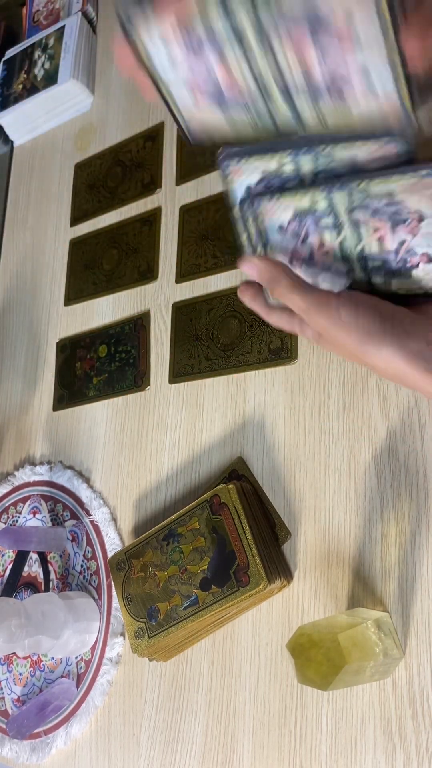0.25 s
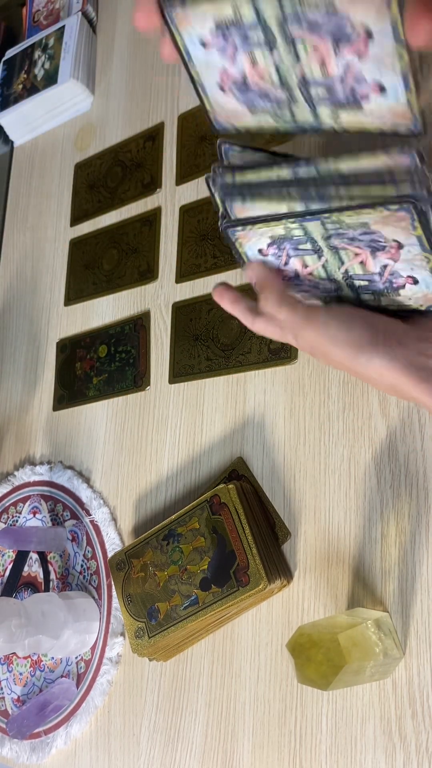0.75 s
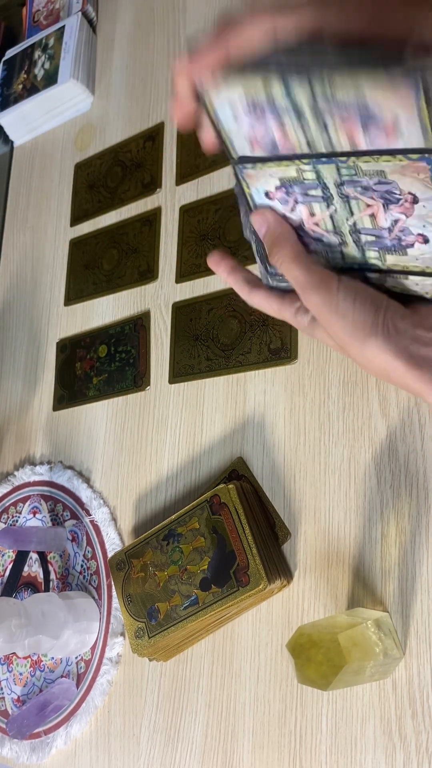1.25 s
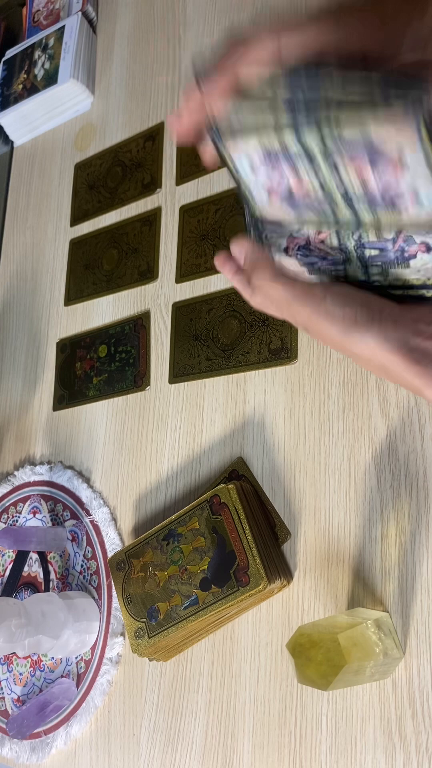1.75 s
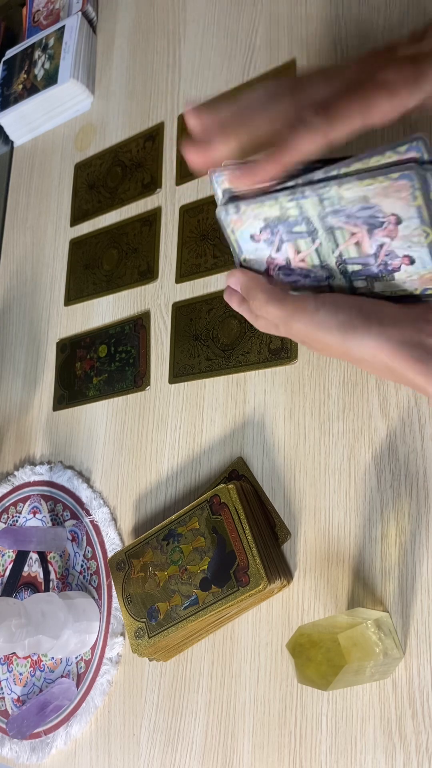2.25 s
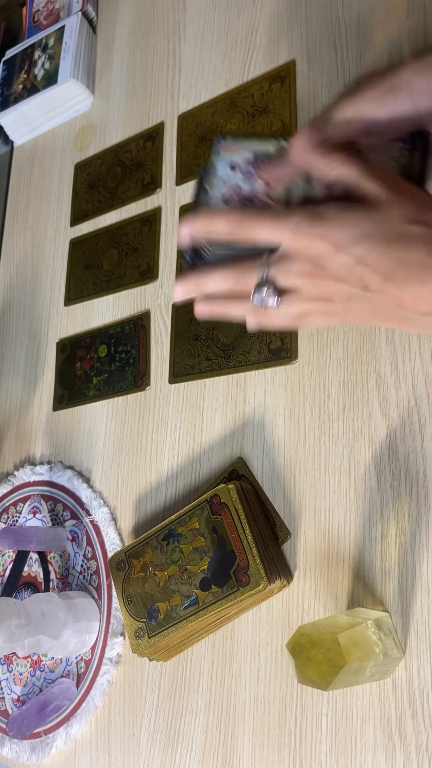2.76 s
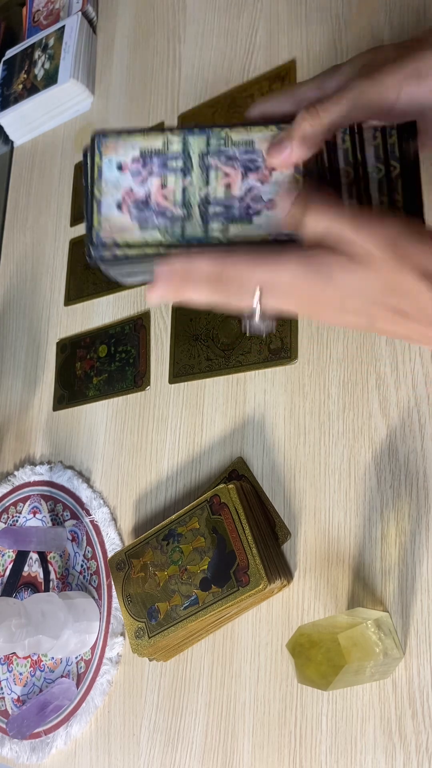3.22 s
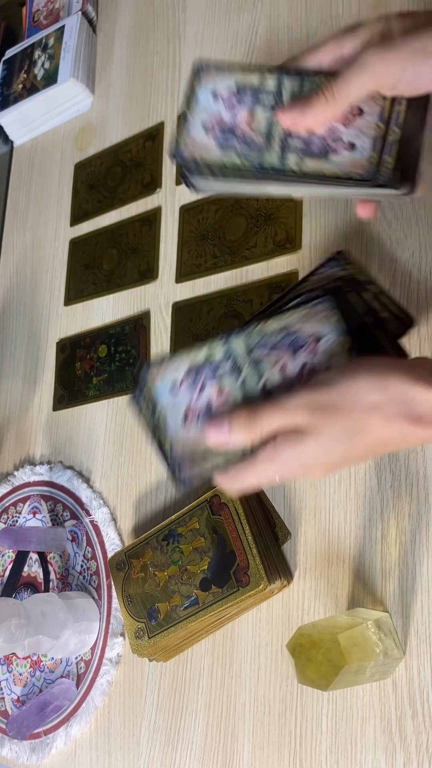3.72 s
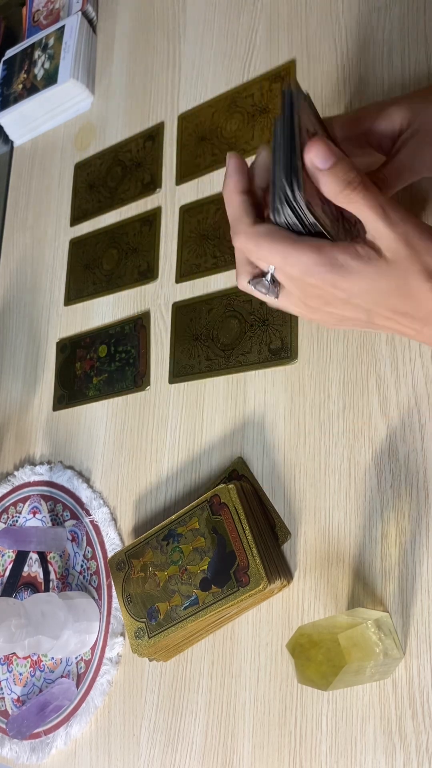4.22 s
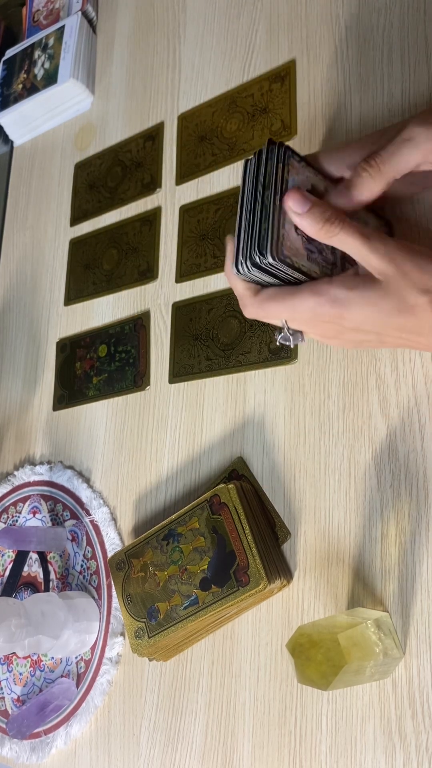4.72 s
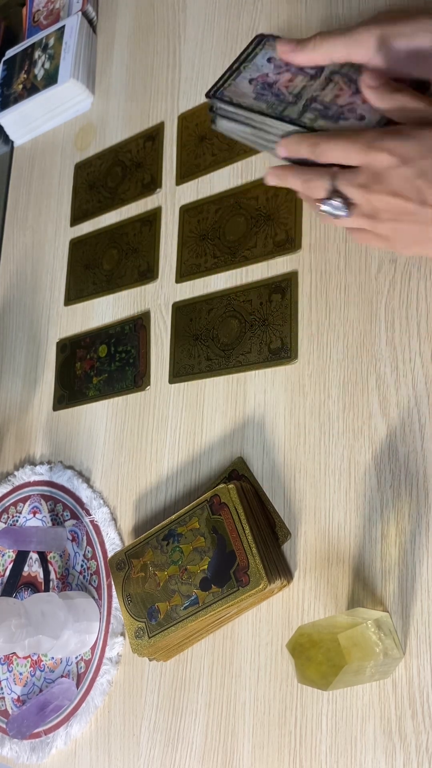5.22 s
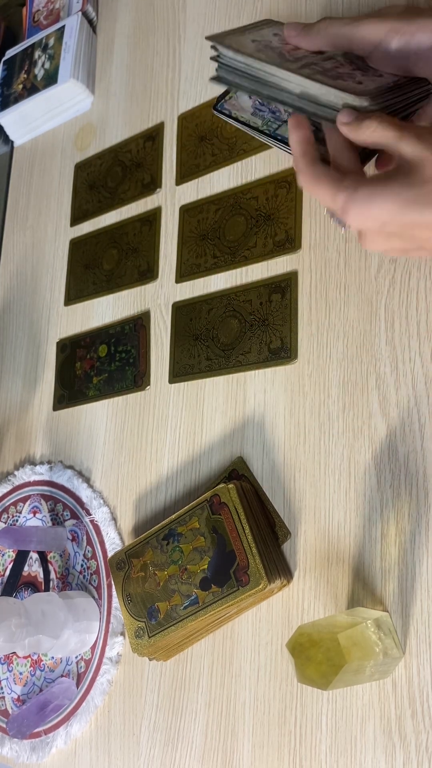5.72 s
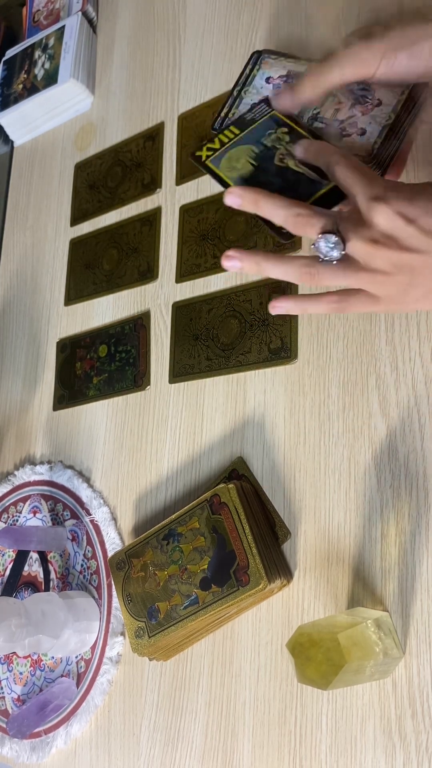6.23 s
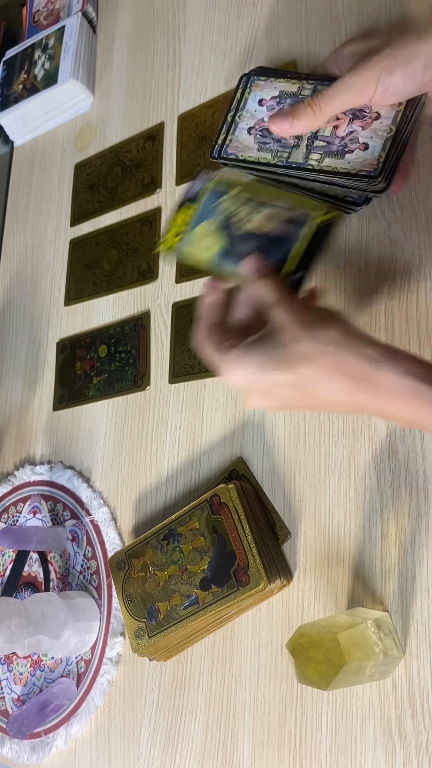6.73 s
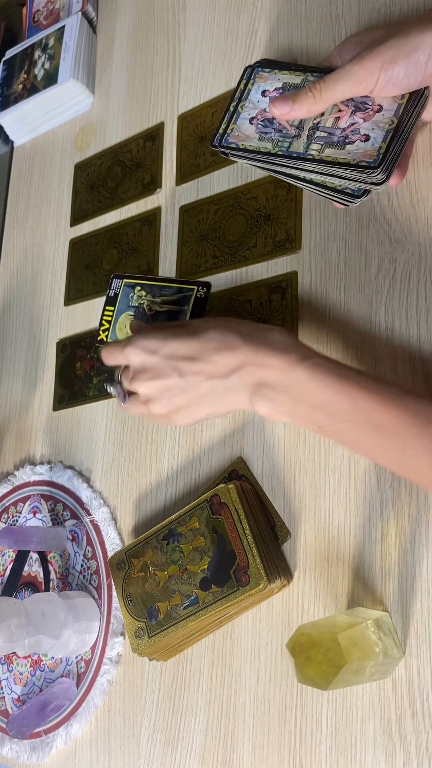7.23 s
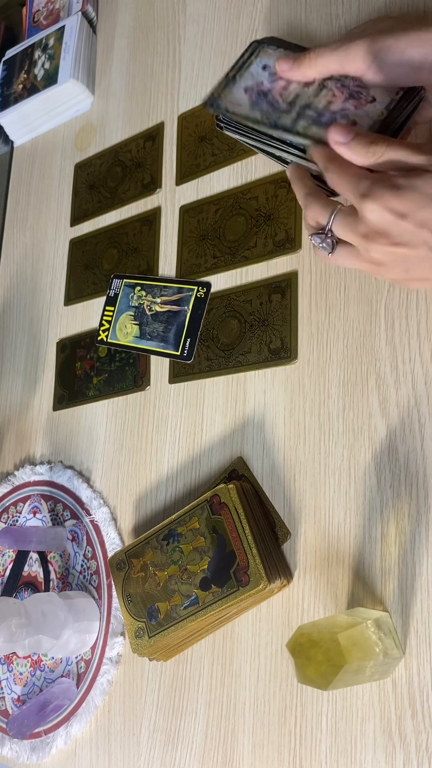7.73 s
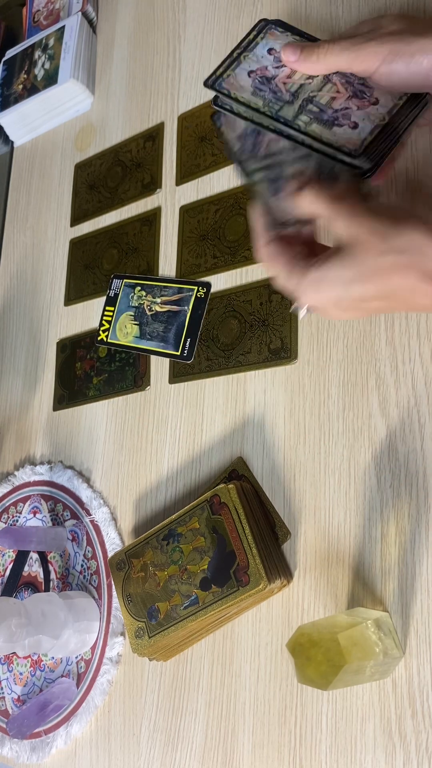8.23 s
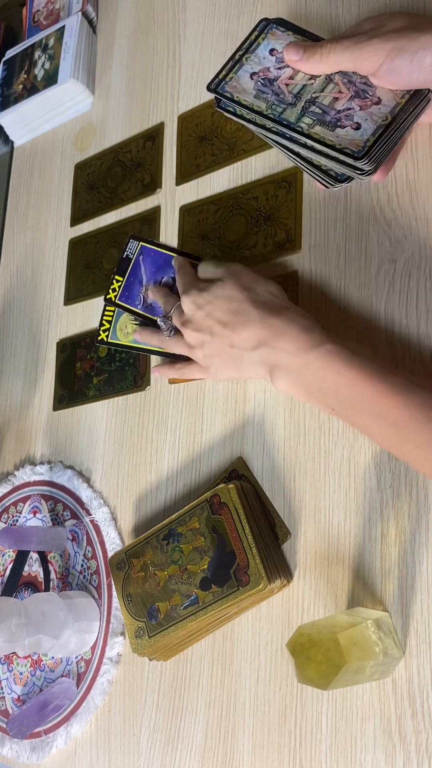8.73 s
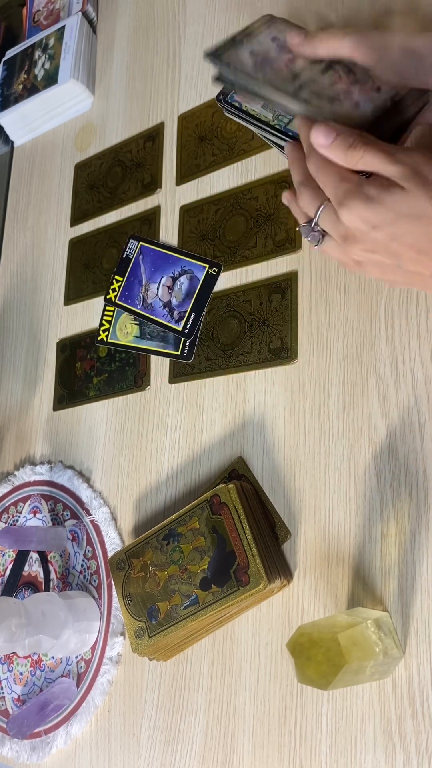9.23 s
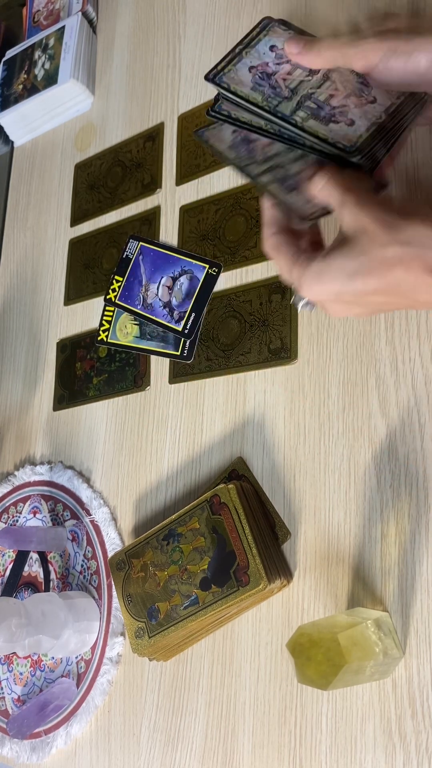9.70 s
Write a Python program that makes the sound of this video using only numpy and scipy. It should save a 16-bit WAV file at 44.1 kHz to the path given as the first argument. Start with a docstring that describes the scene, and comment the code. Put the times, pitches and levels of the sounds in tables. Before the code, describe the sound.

Close-up overhand card shuffling, deck knocked sharply on a wooden table, cards dealt with soft flicks, a steady low rumble underneath.

```python
"""A deck of large cards is shuffled overhand, squared, and dealt onto a wooden table in a quiet room.
Packets clap through card resonances and faces hiss as shaped friction noise; at 4.3 s one hard knock rings
the table's modes. Sparser slides and claps follow, and at 8.7 s a card edge rasps on a gliding tone.
Throughout lie a noise rumble, a wavering hum, a thin high whine and room tone, with gliding low notes
that come and go; two close microphone ports hear it all."""
import sys
import numpy as np
from scipy import signal
from scipy.fft import rfft, irfft, next_fast_len
from scipy.io import wavfile
from scipy.ndimage import uniform_filter1d

SR = 44100
rng = np.random.default_rng(int(sys.argv[2]) if len(sys.argv) > 2 else 0)


def waveform_to_disk(signal):
    """Save audio, clipped to [-1, 1], as 16-bit WAV at the path in sys.argv[1]."""
    frames = np.transpose(np.atleast_2d(signal))
    scaled = np.clip(frames, -1, 1) * 32767
    samples = np.round(scaled).astype(np.int16)
    wavfile.write(sys.argv[1], SR, samples)


def gain_from_db(level_db):
    """Convert decibel levels to linear amplitude factors (20 dB per decade)."""
    decades = np.asarray(level_db, float) / 20
    return 10 ** decades


N = 439236
TIME = np.arange(N) / SR
SIZE = next_fast_len(N + SR)
HZ = np.arange(SIZE // 2 + 1) * SR / SIZE + 1e-3   # just above zero, for the logarithm


def rms_one(x):
    """Scales to unit rms."""
    return x / np.sqrt(np.mean(x ** 2) + 1e-20)


def in_time(rows):
    """Columns of a curve table at every sample."""
    s, *columns = np.transpose(rows)
    return [np.interp(TIME, s, column) for column in columns]


def at_hz(points):
    """A spectrum table on the FFT grid, interpolated over log frequency."""
    hz, value = np.transpose(points)
    return np.interp(np.log(HZ), np.log(hz), value)


def colour_db(points):
    """A spectrum in dB that falls to -80 dB beyond its ends."""
    return at_hz([(points[0][0] / 1.5, -80), *points, (points[-1][0] * 1.2, -80)])


def shaped(x, gain):
    """Applies a gain per frequency."""
    return irfft(rfft(x, SIZE) * gain, SIZE)[..., :N]


def drift(rate_hz):
    """Slow random wander of unit rms, rolling off above rate_hz."""
    return rms_one(shaped(rng.standard_normal(N), 1 / (1 + (HZ / rate_hz) ** 2)))


def resonance(x, hz, width_hz):
    """Two-pole resonance, gain 1 on top."""
    r = np.exp(-np.pi * width_hz / SR)
    zeros = np.array([1, 0, -1]) * (1 - r * r) / 2
    return signal.lfilter(zeros, [1, -2 * r * np.cos(2 * np.pi * hz / SR), r * r], x + 1e-18)


def taps(rattle_db=-12, clap_db=11, clap_width_hz=150, mid_db=5.5, mid_follows=0.2):
    """A sharp crack and a short rattle of edges excite the card resonances and the air pocket between packets."""
    # card edges meeting: t/s, peak level before the room/dB, body tilt/dB, treble tilt/dB, air-pocket f/Hz
    edge_hits = [(0.077, -32, 15, -15, 626), (0.09, -32, -9, -28, 780), (0.1, -39, -25, -10, 2020),
                 (0.114, -34.5, 17.5, -15, 748), (0.289, -44.5, -24, 6, 1340),
                 (0.312, -33.5, -33, -19, 1400), (0.32, -26, -25, -14, 2050),
                 (0.3224, -24.5, -20, -27, 1070), (0.33, -29.5, -29, -12.5, 1900),
                 (0.38, -35, -14, -13.5, 528), (0.394, -28.5, 1, -17, 540), (0.582, -39, -21, -9, 638),
                 (0.596, -38, -34, -24, 1900), (0.611, -17, -17, -22, 1480), (0.614, -24.5, -23, -23, 1430),
                 (0.616, -42, -34, -16.5, 1800), (0.674, -30.5, -41, -1.5, 1840),
                 (0.87, -33.5, -12, -17.5, 1010), (0.973, -39, -35, -14, 2200),
                 (0.976, -25.5, -35, 3, 1610), (1.152, -40, -30, 5, 2000), (1.157, -28, -24, -11, 1390),
                 (1.171, -28, -34, 10.5, 2000), (1.1719, -19, -44, -5.5, 1550),
                 (1.1844, -28, -32, -24, 1690), (1.218, -33, -9.5, -12, 552), (1.256, -28.5, -31, -6, 1510),
                 (1.436, -36.5, -9, -8, 528), (1.528, -37.5, -18, -33, 2000),
                 (1.535, -44.5, -25, -27, 2280), (1.55, -34.5, -15, -27, 890),
                 (1.733, -27.5, -35, -15, 970), (1.75, -48, -27, -21, 1200), (1.783, -38, -26, -18, 1390),
                 (2.039, -17, -33, -8.5, 1600), (2.043, -27, -13, -23, 1000), (2.05, -30.5, -35, 15, 1840),
                 (2.063, -48, -21, -10, 1500), (2.071, -33.5, -27, 9, 1500), (2.083, -27, -34, -19, 1910),
                 (2.266, -56, 12, -8, 501), (2.275, -41, 8.5, -2, 740), (2.629, -40.5, -15, 2, 573),
                 (2.69, -44, -10, 9, 939), (3.347, -44, -23, -3, 511), (3.362, -43.5, -16, 2, 545),
                 (3.599, -30, 0.5, -10, 610), (3.628, -37, -5.5, -9.5, 554), (3.715, -44.5, -18, -2, 600),
                 (3.843, -30.5, -25, -5, 1500), (3.844, -29.5, -18, -11, 890),
                 (3.853, -35, -14.5, -13, 1000), (3.879, -35, -12.5, -27, 1350),
                 (3.888, -33.5, -28, 9, 1400), (3.916, -24.5, -35, 13, 651), (3.932, -29.5, -32, -1, 3000),
                 (3.944, -22, -22, -15, 2580), (4.108, -42.5, -18, -32, 1760),
                 (4.121, -44, -19.5, -20, 1870), (4.139, -42, -20.5, -27, 1300),
                 (5.158, -48.5, -16, -5, 579), (5.56, -47.5, -7.5, -8, 754), (5.863, -31, 14, -11, 851),
                 (5.87, -43, -18, -35, 780), (5.903, -45, -36, -17, 1220), (5.922, -33, -23, -22, 1180),
                 (5.929, -49, -3, -28, 716), (5.936, -39.5, -25, -36, 1220), (5.947, -35, -27, -3.5, 1500),
                 (5.964, -36.5, -7, -29, 1520), (5.969, -40.5, -9, -33, 760), (6.028, -40, -30, -13, 5900),
                 (6.038, -46, -14, -25, 1170), (6.044, -39, -33, -40, 1100), (6.048, -40.5, -19, -39, 990),
                 (6.09, -42, -16, -32, 900), (6.095, -58, -22, -17, 2620), (6.189, -37, -3.5, -19.5, 1220),
                 (6.266, -40.5, -11, -16, 807), (6.459, -60.5, -5, 3, 570), (6.589, -45, 23, 4, 735),
                 (6.621, -45.5, 5, 2, 575), (6.635, -38.5, -7, -12.5, 1340), (6.732, -42.5, 15.5, 15, 560),
                 (7.077, -38, -31, -7, 2190), (7.095, -33, -23, -4, 1200), (7.134, -53, -30, -4, 2300),
                 (7.156, -42.5, -13, 16, 592), (7.21, -44.5, -13, 15, 498), (7.544, -57, -4, -6, 600),
                 (7.577, -52.5, -10, -13, 610), (7.721, -30, -1.5, 4, 1530),
                 (8.223, -23.5, -19, -10.5, 1740), (8.341, -23, -5, -8.5, 860),
                 (8.347, -36, -13.5, -24.5, 890), (8.402, -45, -12, -27, 568),
                 (8.487, -47.5, -24, -23, 1500), (8.586, -29.5, -12.5, -11, 900),
                 (8.601, -37.5, -36, -30, 1670), (8.702, -42.5, -30, -27, 2320),
                 (8.723, -34.5, -39, -11, 1880), (8.729, -35, -38, -8, 2800), (9.04, -59, -8, 3, 606),
                 (9.354, -48, -1, -15, 711), (9.681, -22.5, -16, -9, 1700), (9.685, -24, -10, -40, 730),
                 (9.788, -25, 2.5, -7.5, 770), (9.813, -33, -15, -8.5, 1700), (9.87, -34.5, -19, -15, 1590),
                 (9.874, -37.5, -28, -9, 1690)]
    # resonances of the cards: f/Hz, width/Hz, relative level/dB
    card_modes = [(174, 160, 21), (364, 110, 16), (596, 170, 19), (830, 120, 1.5), (1610, 660, -0.5),
                  (2140, 720, -7.5), (3100, 2600, -15), (4360, 680, 8.5), (5500, 2000, 7),
                  (7340, 2100, -4.5), (9450, 6400, 3.5), (11000, 2900, -7)]
    crack_s, rattle_t60_s, onset_s = 0.0016, 0.04, 0.00036
    spread_db = 2.5   # chance strength of each resonance
    body_lag = round(0.002 * SR)   # the packet's body answers just after the edge
    out, t = np.zeros(N + SR), np.arange(SR // 10) / SR
    luck = rng.normal(0, 1, (len(edge_hits), len(card_modes)))
    noise = rng.standard_normal((len(edge_hits), len(t)))
    crack = np.exp(-(t / crack_s) ** 2)
    envelope = (crack + gain_from_db(rattle_db - 60 * t / rattle_t60_s)) * np.minimum(t / onset_s, 1)

    def ring(push, hz, width_hz):
        """One resonance, whose energy grows with its width."""
        return np.sqrt(width_hz) * rms_one(resonance(push, hz, width_hz))

    for (s, peak_db, body_db, treble_db, clap_hz), chance, rattle in zip(edge_hits, luck, noise):
        push = rattle * envelope
        sound = gain_from_db(clap_db) * ring(push, clap_hz, clap_width_hz)
        for (hz, width_hz, level_db), c in zip(card_modes, chance):
            if hz < 900:
                tilt_db = body_db
            elif hz > 4000:
                tilt_db = treble_db
            else:
                tilt_db = mid_db + mid_follows * treble_db if hz > 2000 else 0
            mode = np.roll(ring(push, hz, width_hz), body_lag * (hz < 900))
            sound = sound + gain_from_db(level_db + tilt_db + spread_db * c) * mode
        at = round(s * SR)
        out[at:at + len(t)] += gain_from_db(peak_db) * sound / np.abs(sound).max()
    return out[:N]


def pressure():
    """Hiss and scuff level in dB: each stroke rises, sags while held and lets go; strokes add in power."""
    # faces sliding, a row a stroke: t at full pressure/s, rise/s (0.003 at least), hold/s,
    # hiss level/dB, scuff level/dB
    strokes = [(0.0, .01, 0.039, -60.5, -74), (0.073, 0.0073, 0.015, -55, -55),
               (0.13, .01, 0.077, -95, -79), (0.163, .01, 0.01, -74, -73),
               (0.288, .005, 0.0044, -65, -56.5), (0.311, 0.0055, 0.081, -58.5, -54),
               (0.443, .01, 0.03, -77, -74), (0.464, .004, 0.0046, -76, -85),
               (0.58, 0.0056, 0.082, -58.5, -51.5), (0.661, 0.023, 0.0036, -52, -49.5),
               (0.725, .01, 0.066, -63.5, -64.5), (0.865, .004, 0.17, -59.5, -58.5),
               (0.956, 0.067, 0.0064, -49, -54), (1.006, .01, 0.032, -83, -83),
               (1.163, .005, 0.084, -51.5, -52.5), (1.25, 0.046, 0.0029, -72, -63),
               (1.277, 0.0091, 0.036, -80, -73.5), (1.436, 0.0046, 0.137, -56, -59),
               (1.57, .01, 0.082, -96, -77.5), (1.74, .004, 0.16, -56, -59.5),
               (1.926, .01, 0.091, -91.5, -73.5), (2.037, 0.0027, 0.037, -48.5, -45.5),
               (2.12, 0.012, 0.036, -78, -58), (2.266, 0.0069, 0.0048, -63, -66),
               (2.356, .04, 0.011, -77.5, -73.5), (2.539, 0.016, 0.17, -66, -64.5),
               (2.927, 0.33, 0.049, -74, -77), (2.99, 0.14, 0.067, -74, -75.5),
               (3.06, 0.051, 0.059, -73, -87), (3.348, 0.054, 0.011, -66, -61.5),
               (3.488, 0.088, 0.011, -56.5, -56), (3.59, 0.1, 0.008, -64, -61.5),
               (3.707, 0.28, 0.019, -71, -73), (3.839, .003, 0.0052, -49, -57.5),
               (3.931, 0.19, 0.043, -58, -54), (3.972, .01, 0.16, -70, -65.5), (4.1, .01, 0.03, -64, -62),
               (4.173, .08, 0.12, -68.5, -70), (4.268, 0.0039, 0.023, -51.5, -37.5),
               (4.316, .01, 0.14, -69, -49), (4.512, 0.0037, 0.0064, -86, -43),
               (4.543, .004, 0.016, -60, -49.5), (4.602, .01, 0.092, -91, -54),
               (4.754, 0.089, 0.0065, -62.5, -56.5), (4.933, 0.032, 0.018, -72.5, -69.5),
               (5.002, 0.084, 0.11, -69.5, -72.5), (5.14, 0.033, 0.11, -79, -86),
               (5.55, 0.029, 0.016, -77, -93), (5.707, 0.082, 0.075, -72.5, -74),
               (5.81, 0.19, 0.061, -65.5, -67.5), (5.9, 0.13, 0.043, -56.5, -55),
               (5.994, 0.051, 0.0054, -82, -66), (6.013, .012, 0.0093, -64.5, -64),
               (6.087, 0.033, .012, -71, -66), (6.195, 0.12, 0.01, -75.5, -65),
               (6.272, 0.1, 0.071, -73.5, -67.5), (6.457, 0.037, .01, -80, -93),
               (6.644, 0.09, 0.039, -72.5, -66), (6.737, .02, 0.014, -80, -70),
               (7.089, 0.019, 0.12, -70.5, -64), (7.545, 0.028, 0.012, -78, -81),
               (7.637, 0.036, 0.048, -100, -68.5), (7.723, .01, 0.036, -75, -68),
               (7.764, 0.029, 0.17, -85.5, -84.5), (8.181, 0.25, 0.025, -64, -69.5),
               (8.226, 0.006, 0.081, -55.5, -60), (8.317, 0.0091, 0.099, -69, -60),
               (8.441, 0.026, 0.0066, -65.5, -57.5), (8.586, 0.0027, 0.0067, -64.5, -60),
               (8.637, .01, 0.075, -78, -74), (8.718, 0.032, 0.0057, -67, -63),
               (8.755, .01, 0.053, -80, -77.5), (9.033, 0.0078, 0.0085, -77, -97),
               (9.087, 0.019, 0.011, -80, -93), (9.57, 0.025, 0.24, -65.5, -71),
               (9.705, .015, 0.042, -65, -62), (9.77, 0.023, 0.076, -65, -56.5),
               (9.872, .025, 0.0073, -66, -58), (9.902, .01, 0.054, -82, -78)]
    rise_db, sag_db_per_s, release_db_per_s = 36.5, 41.5, 306
    still_db = -105   # floor between strokes
    t = np.arange(0, N + 32, 32) / SR
    s, rise, hold, hiss_db, scuff_db = np.transpose(strokes)[..., None]
    since = t - s
    shape_db = rise_db * np.minimum(since, 0) / np.maximum(rise, .003)
    shape_db = shape_db - sag_db_per_s * np.clip(since, 0, hold)
    shape_db = shape_db - release_db_per_s * np.maximum(since - hold, 0)
    levels = []
    for level_db in (hiss_db, scuff_db):
        power = gain_from_db(still_db) ** 2 + np.sum(gain_from_db(level_db + shape_db) ** 2, axis=0)
        levels.append(np.interp(TIME, t, 10 * np.log10(power)))
    return levels


def slides(hiss_db, scuff_db, grains_per_s=5000, grain_db=3.0, flutter_db=3.0, patchy_db=1.5):
    """Coated faces rub: dense tiny slips over smooth friction, fluttering as the pressure changes."""
    # colours of the four registers, low to high: f/Hz, relative level/dB
    scuff_colour = [(250, 13), (500, 11.5), (1000, 9.5), (1600, 8), (2200, 5.5), (2500, -41)]
    scrape_colour = [(2000, -14), (2300, 3), (3200, 4), (4200, -6.5), (4600, 2)]
    hiss_colour = [(4000, -2), (4400, 2.5), (6000, 12), (8000, 7.5), (9000, -12.5)]
    top_colour = [(7800, -12), (8800, -1.5), (10500, 0), (12000, -3.5), (14000, -27.5)]
    sizes = gain_from_db(grain_db * np.minimum(rng.exponential(1, N), 3.0)) * rng.choice([-1, 1], N)
    rub = sizes * (rng.random(N) < grains_per_s / SR) + 0.95 * rng.standard_normal(N)
    # scrape follows scuff and top follows hiss, each less for each dB that scuff exceeds hiss
    dull_db = np.maximum(scuff_db - hiss_db, 0)
    scrape_db = scuff_db - 2.5 - 0.074 * dull_db
    top_db = hiss_db - 2 - 0.15 * dull_db
    registers = ((hiss_db, hiss_colour), (scuff_db, scuff_colour), (scrape_db, scrape_colour),
                 (top_db, top_colour))
    out = 0
    for level_db, colour in registers:
        # each register also catches and slips on its own
        out = out + gain_from_db(level_db + patchy_db * drift(53)) * rms_one(shaped(rub, gain_from_db(colour_db(colour))))
    return gain_from_db(flutter_db * drift(50)) * out


def ticks(hiss_db, scuff_db, loudest_db=-52):
    """Single cards let go at random while the faces slide, each with a tiny pitched snap."""
    per_s, cycles, low_db, high_db = 110, 5, -21, -11   # width is pitch over cycles; dB against the slide
    pitches = np.geomspace(1000, 7000, num=9)
    snaps = (rng.random(N) < per_s / SR) * rng.uniform(-0.79, 1, N)
    dealt = rng.integers(0, len(pitches), N)

    def register(part):
        """The snaps of some of the pitches."""
        return rms_one(sum(resonance(snaps * (dealt == k), pitches[k], pitches[k] / cycles) for k in part))

    low, high = register(range(5)), register(range(5, 9))
    return gain_from_db(low_db + np.minimum(scuff_db, loudest_db)) * low + gain_from_db(high_db + hiss_db) * high


def rasp():
    """Uneven slips ring the free end of the card, whose pitch mostly climbs as it shortens."""
    # a card edge dragged into place: t/s, f/Hz, level/dB
    drag = [(8.62, 1881, -78), (8.645, 2200, -62), (8.67, 2600, -63), (8.70, 2800, -60),
            (8.72, 2913, -60.5), (8.73, 2870, -41), (8.745, 3100, -79)]
    slips_per_s, width_hz = 400, 300
    hz, level_db = in_time(drag)
    slips = (rng.random(N) < slips_per_s / SR) * rng.standard_normal(N) + 0.018 * rng.standard_normal(N)
    ringing = rms_one(signal.lfilter([1], [1, -np.exp(-np.pi * width_hz / SR)], slips))
    inside = (TIME > drag[0][0]) & (TIME < drag[-1][0])
    return inside * gain_from_db(level_db) * ringing * np.sin(2 * np.pi * np.cumsum(hz) / SR)


def knocks(landing_s=0.0022, crackle_db=2, settle_db=-20, settle_s=0.048, ring_db=2.0):
    """Each blow strikes the table modes in its own mix; the deck's edges crackle as they land and settle."""
    # blows on the table: t/s, level/dB, upper-mode tilt/dB, lowest-mode tilt/dB
    blows = [(4.259, -28, -13.5, -5), (4.2725, -14.5, -12, -1), (4.2764, -11.5, -6.5, -5.5),
             (4.282, -28.5, 7.5, 16), (4.296, -17.5, -1, 2.5), (4.298, -26.5, 11, 17.5),
             (4.308, -24.5, -3, 10.5), (4.513, -34, 1.5, -4), (4.518, -35.5, -6, 4.5),
             (4.545, -38.5, 14.5, -1), (4.562, -47, 13, -2), (4.573, -42, 12, 6), (4.61, -49, -11, 4),
             (4.625, -34, -17, 1), (4.649, -41.5, 5.5, -8), (4.667, -46, -16, -8), (4.738, -36, -23, -6),
             (4.748, -32.5, -21, 0), (4.76, -35, -19, 13.5), (4.775, -34.5, -16, -16.5)]
    # modes of the table top: nominal f/Hz, relative level/dB, t60/s
    table_modes = [(115, -22, .22), (282, -22, .16), (465, -15, .14), (535, -21, .06), (640, -19, .06),
                   (708, -12, .13), (985, -26, .2), (1200, -19, .04), (1520, -15, .05), (1803, -16, .04),
                   (2180, -11, .045), (2690, -11, .03), (2800, -7, .045), (3000, -14, .025),
                   (3340, -15, .02), (3650, -14, .015), (4320, -14, .01), (5300, -15, .008)]
    spread_db, detune = 2, .007   # each landing place shifts the upper modes a little
    free_s, damped_db, damp_s = 0.026, -17.5, 0.0048   # rings freely, then the flat deck muffles it
    out, crackle, t = np.zeros(N), np.zeros(N), np.arange(SR // 3) / SR
    hz, level_db, t60 = np.transpose(table_modes)[..., None]
    upper = hz > 1100
    luck = rng.standard_normal((len(blows), 2, len(table_modes), 1))
    noise = rng.standard_normal((len(blows), len(t)))
    muffle_db = damped_db * np.clip((t - free_s) / damp_s, 0, 1) * (hz > 400) * (hz < 900)
    landing = np.exp(-t / landing_s) + gain_from_db(settle_db) * np.exp(-t / settle_s)
    for (s, peak_db, upper_db, lowest_db), (chance, shift), grit in zip(blows, luck, noise):
        tilt_db = np.where(upper, upper_db, np.where(hz < 300, lowest_db, 0))
        push = np.where(upper, np.sign(shift), 1)   # the lower modes are always pushed the same way
        envelope_db = peak_db + level_db + tilt_db + spread_db * chance - 60 * t / t60 + muffle_db
        rings = push * gain_from_db(envelope_db) * np.sin(2 * np.pi * hz * (1 + detune * shift * upper) * t)
        at = round(s * SR)
        out[at:at + len(t)] += rings.sum(axis=0)
        crackle[at:at + len(t)] += gain_from_db(peak_db + upper_db + crackle_db) * grit * landing
    edges = resonance(crackle, 2700, 1700)
    edges = edges + gain_from_db(ring_db) * (resonance(crackle, 2790, 160) - resonance(crackle, 2180, 160))
    soft = signal.butter(3, 5950, fs=SR, output="sos")   # a thick deck lands softly: little top
    return signal.sosfilt(soft, out + edges)


def room(x, late_db=-8):
    """The direct sound reaches both ports alike; reflections, a dying noise, reach each differently."""
    # direct sound against reflections: f/Hz, direct power share (0-1)
    direct = [(250, 1), (430, .9), (860, .7), (1250, .7), (1600, .9), (2100, .9), (2500, .65), (3400, .6),
              (4300, .6), (4900, .5), (5800, .85), (12000, .9)]
    early_db, early_s, late_t60_s = -5, 0.0021, 0.046
    tail_db, tail_t60_s = -30, 0.7   # faint long tail
    t, share = np.arange(SR // 2) / SR, np.clip(at_hz(direct), 0, 1)
    decay = gain_from_db(late_db - 60 * t / late_t60_s) + gain_from_db(tail_db - 60 * t / tail_t60_s)
    decay = decay + gain_from_db(early_db) * np.exp(-t / early_s)
    echoes = rng.standard_normal((2, len(t))) * decay * (t > .0008)
    echoes = echoes / np.linalg.norm(echoes, axis=1, keepdims=True)
    heard = np.sqrt(share) + np.sqrt(1 - share) * rfft(echoes, SIZE)
    # the reflections keep an even broad colour
    broad = np.sqrt(uniform_filter1d(np.abs(heard) ** 2, size=1500, axis=1))
    return shaped(x, heard / broad)


def low_hum():
    """A broad noise rumble and a hum wavering in pitch and level, the same at both ports."""
    # course of the low sounds: t/s, rumble level/dB, hum level before its mix/dB
    course = [(0.0, -52, -51), (0.55, -46.5, -50.5), (4.94, -45, -45.5), (5.82, -45.5, -48),
              (5.94, -41, -45), (8.85, -44.5, -49), (8.99, -38.5, -57.5), (9.13, -43.5, -48),
              (9.93, -42, -46), (9.96, -52, -45)]
    # rumble colour: f/Hz, relative level/dB
    rumble_colour = [(20, -21.5), (40, -7.5), (48, -2.5), (62, 2.5), (78, 3.5), (88, 2.5), (97, -6),
                     (106, -2.5), (125, -23.5), (140, -40.5)]
    hum_hz, width_hz = 114.1, 3.7
    rumble_db, hum_db = in_time(course)
    rumble = rms_one(shaped(rng.standard_normal(N), gain_from_db(colour_db(rumble_colour))))
    # a steady rumble: its level is evened over about a quarter second
    rumble = rms_one(rumble / np.sqrt(uniform_filter1d(rumble ** 2, size=SR // 4) + 0.5))
    hum = np.sqrt(2) * np.sin(2 * np.pi * np.cumsum(hum_hz + 0.802 * drift(2.28)) / SR)
    rough = resonance(rng.standard_normal(N), hum_hz, width_hz)
    rough = rms_one(resonance(rough, hum_hz, 3 * width_hz))
    hum_gain = gain_from_db(hum_db + 1.1 * drift(2.2))
    return gain_from_db(rumble_db) * rumble + hum_gain * (1.044 * hum + 0.46 * rough)


def drones(fade_s=0.13, waver_db=1.0):
    """Slowly gliding low notes, wavering, fading in and out."""
    # far engine notes that come and go: start t/s, length/s, from f/Hz, to f/Hz, rms level/dB
    notes = [(1.36, 0.64, 82, 81.8, -57), (5.796, 2.25, 74, 76.97, -44.5), (8.288, 0.67, 58.5, 61.7, -46),
             (8.944, 1.13, 86, 92.1, -49), (9.142, 0.74, 174.5, 178.3, -57.5)]
    out = 0
    for s, length, from_hz, to_hz, level_db in notes:
        hz = np.interp(TIME, [s, s + length], [from_hz, to_hz]) + 1.216 * drift(1.62)
        fade = np.clip(np.minimum(TIME - s, s + length - TIME) / fade_s, 0, 1)
        gain = np.sqrt(2) * fade * gain_from_db(level_db + waver_db * drift(5.0))
        out = out + gain * np.sin(2 * np.pi * np.cumsum(hz) / SR)
    return out


def tones():
    """Noise twice through narrow resonances, and an electric whine of steady sines wavering in level."""
    # narrow noise peaks: f/Hz, width of each pass/Hz, rms level/dB
    noise_peaks = [(178.3, 31, -65), (303.8, 21, -65.5)]
    # electric whine: f/Hz, rms level before its waver/dB
    whine = [(4623, -83), (4574, -88)]
    out = 0
    for hz, width_hz, level_db in noise_peaks:
        once = resonance(rng.standard_normal(N), hz, width_hz)
        out = out + gain_from_db(level_db) * rms_one(resonance(once, hz, width_hz))
    for hz, level_db in whine:
        gain = np.sqrt(2) * gain_from_db(level_db + 2.2 * drift(4.0))
        out = out + gain * np.sin(2 * np.pi * hz * TIME)
    return out


def room_tone(waver_db=3.46, low_waver_db=1.32, split_hz=550):
    """Air noise, partly shared by the two ports; its low part swells and sinks on its own."""
    # room tone: f/Hz, level per Hz/dB
    air_colour = [(90, -103), (130, -76), (260, -82), (430, -86.5), (860, -94), (1550, -102), (2500, -113),
                  (3500, -120), (4500, -110), (5000, -117), (5900, -113), (6900, -116), (7300, -124),
                  (10000, -131), (12200, -134), (13000, -142)]
    # left-right likeness: f/Hz, shared power (0-1)
    likeness = [(260, 0.99), (430, 0.61), (700, 0), (1200, 0.15), (1600, 0.1), (2500, 0.3), (3600, 0),
                (4300, 0), (4650, 1), (5000, 1), (5700, 0.9), (10800, 0), (12500, 0.4)]
    shared, *own = rng.standard_normal((3, N)) * np.sqrt(SR / 2)   # unit power per Hz
    alike, colour = np.clip(at_hz(likeness), 0, 1), gain_from_db(at_hz(air_colour)) * (HZ > 60)
    air = shaped(shared, colour * np.sqrt(alike)) + shaped(np.array(own), colour * np.sqrt(1 - alike))
    low = shaped(air, 1 / (1 + (HZ / split_hz) ** 4))
    return low * gain_from_db(low_waver_db * drift(3.6)) + (air - low) * gain_from_db(waver_db * drift(0.67))


def scene():
    """Edges, faces and table each meet the room from their own place, over the background sounds."""
    levels = pressure()
    edges = room(taps() + rasp())
    faces = room(slides(*levels) + ticks(*levels))
    table = room(knocks())
    return edges + faces + table + low_hum() + drones() + tones() + room_tone()


def roll_off(x):
    """The treble ends steeply here."""
    return signal.sosfilt(signal.butter(12, 12390, fs=SR, output="sos"), x)


def record(dry):
    """The two ports differ in phase, more so towards the treble, and lose the very top."""
    # phase lead of the left port over the right: f/Hz, lead/radians
    left_lead = [(0, 0), (250, 0), (690, -.6), (1100, 0), (1890, .4), (2580, 1.4), (3010, 2.0), (3620, .6),
                 (4200, 1.1), (4620, 2.4), (4910, 3.5), (5250, 6.1), (5700, 6.9), (9900, 8.5), (11200, 9.1),
                 (12500, 9.4)]
    lead = np.interp(HZ, *np.transpose(left_lead))
    ports = shaped(dry, np.exp(.5j * lead * np.array([[1], [-1]])))   # half the lead to each side
    mix = signal.sosfilt(signal.butter(4, 9680, fs=SR, output="sos"), ports)
    return roll_off(mix)


dry = scene()
out = record(dry)
waveform_to_disk(out)
```